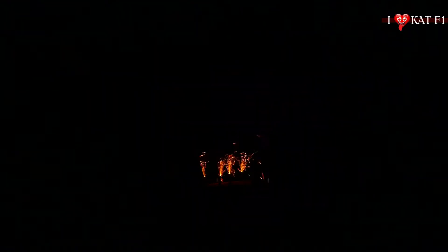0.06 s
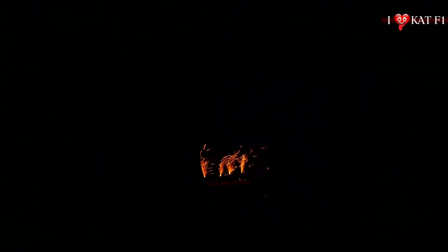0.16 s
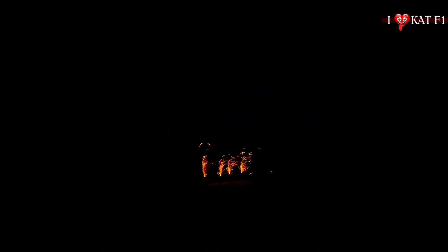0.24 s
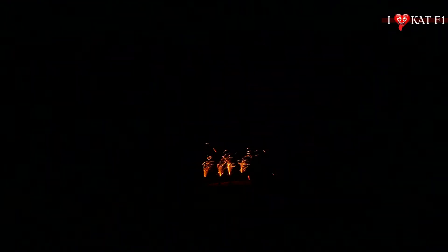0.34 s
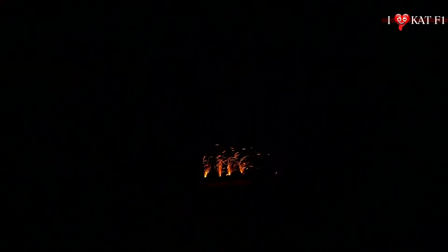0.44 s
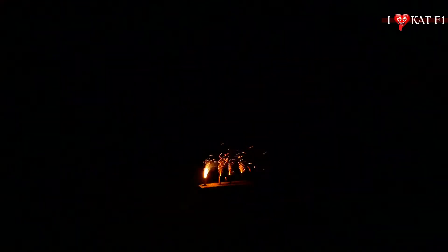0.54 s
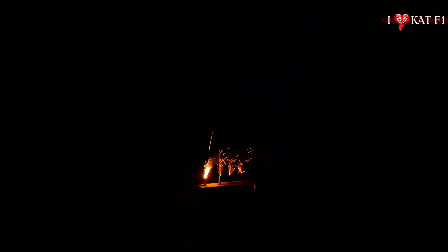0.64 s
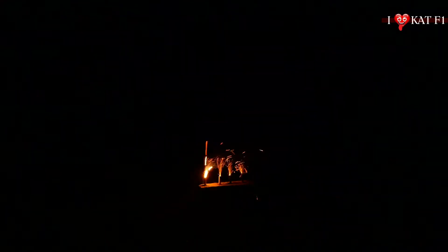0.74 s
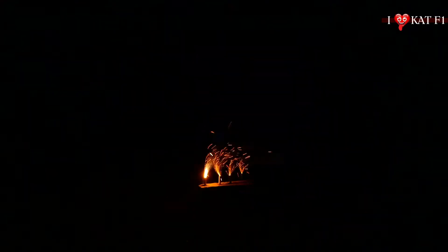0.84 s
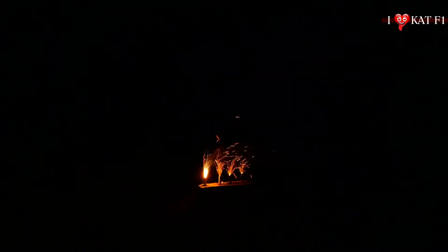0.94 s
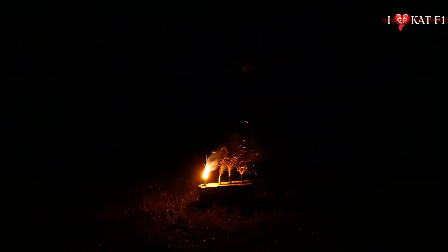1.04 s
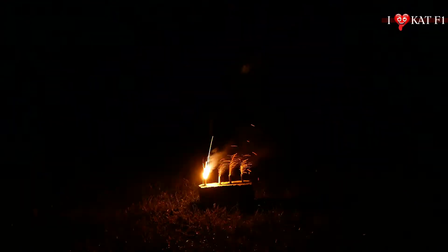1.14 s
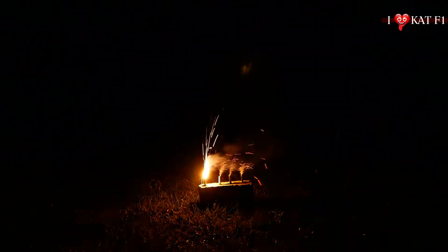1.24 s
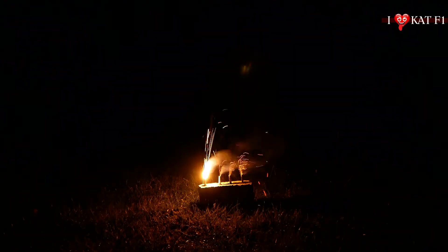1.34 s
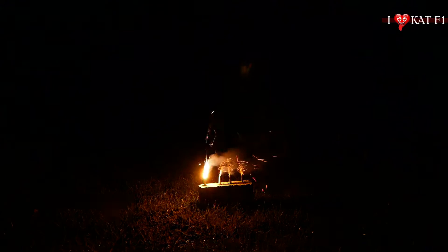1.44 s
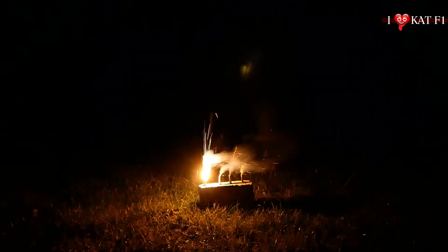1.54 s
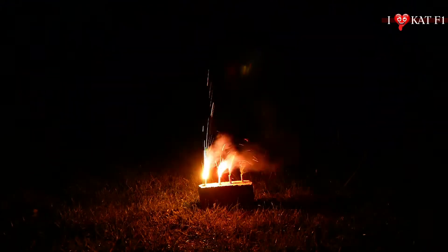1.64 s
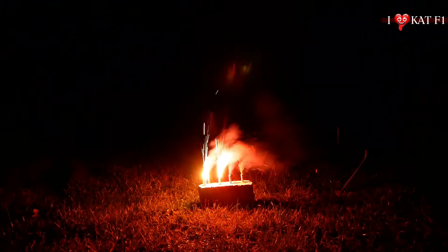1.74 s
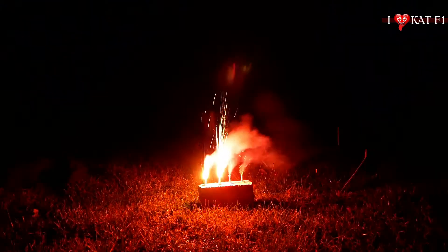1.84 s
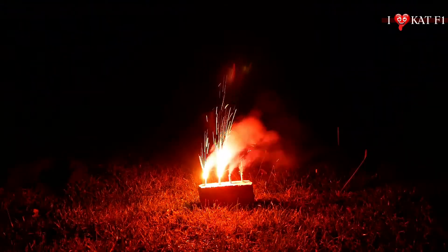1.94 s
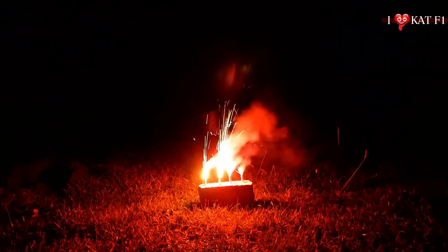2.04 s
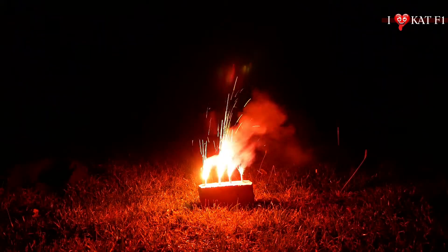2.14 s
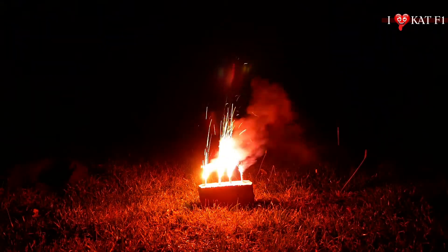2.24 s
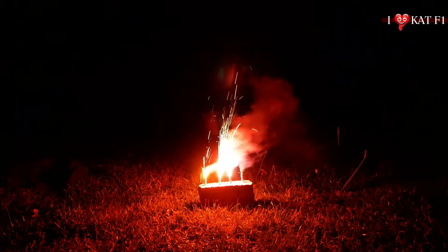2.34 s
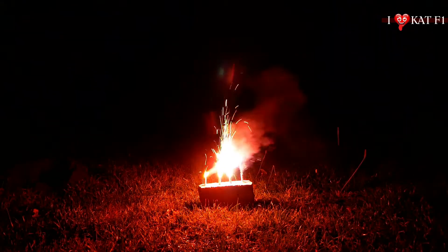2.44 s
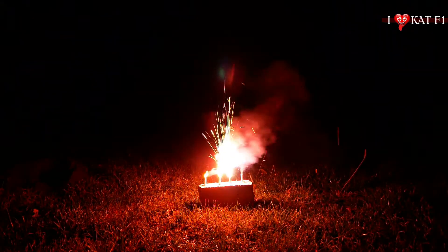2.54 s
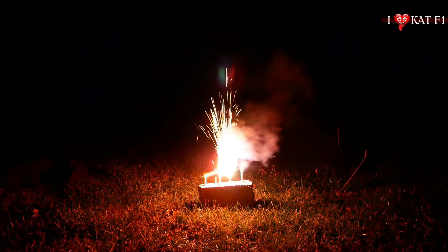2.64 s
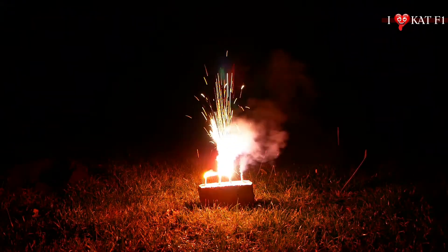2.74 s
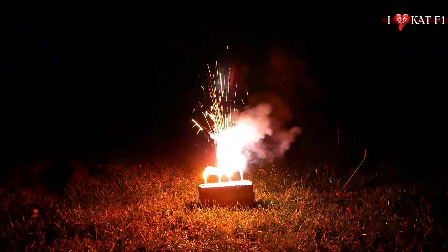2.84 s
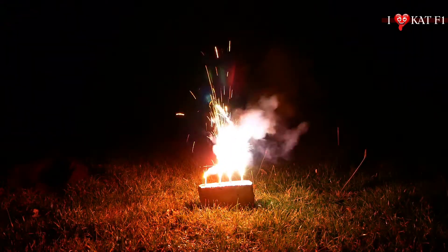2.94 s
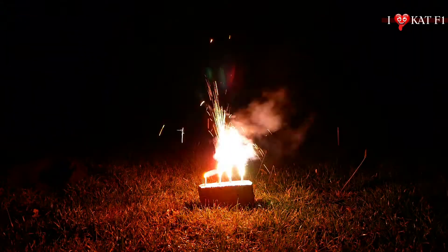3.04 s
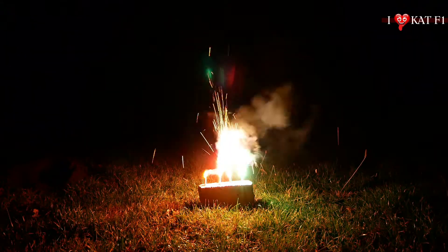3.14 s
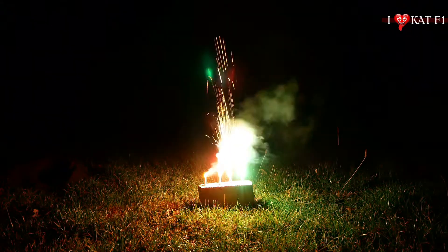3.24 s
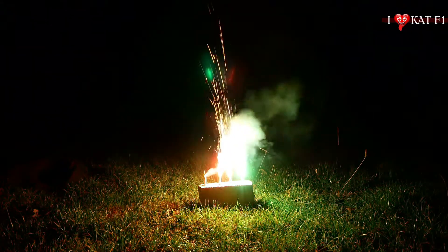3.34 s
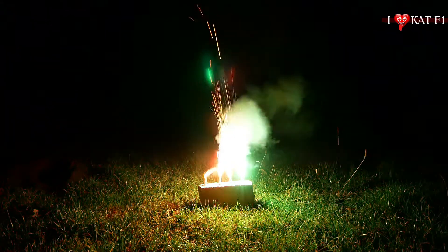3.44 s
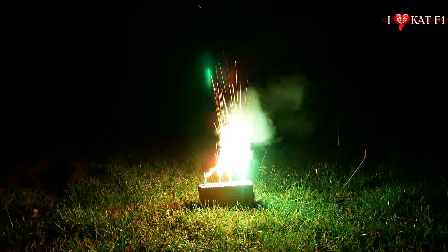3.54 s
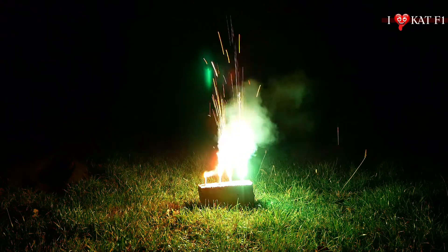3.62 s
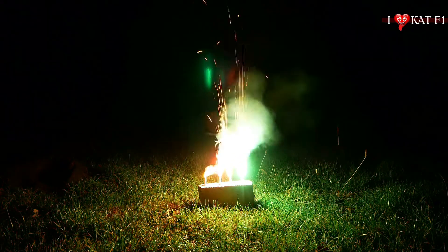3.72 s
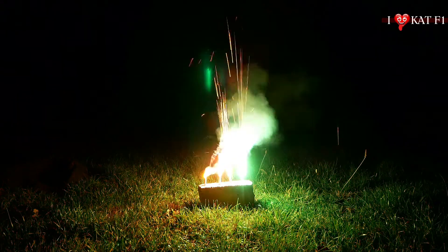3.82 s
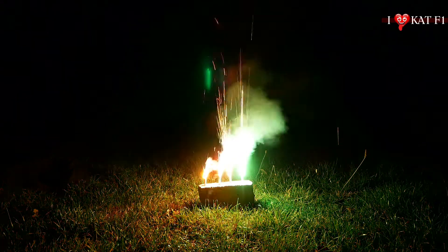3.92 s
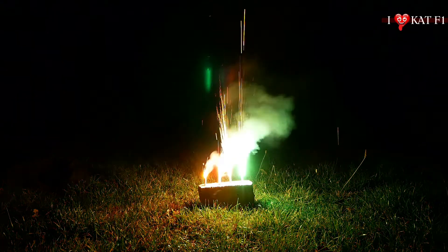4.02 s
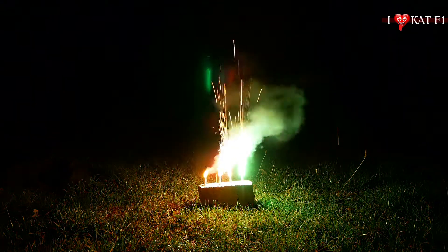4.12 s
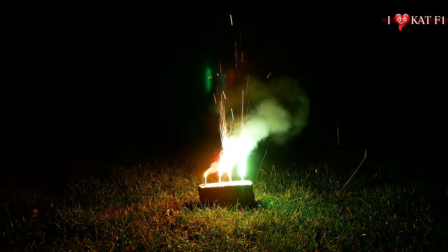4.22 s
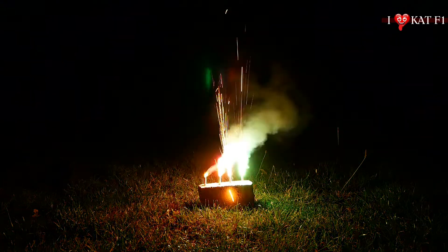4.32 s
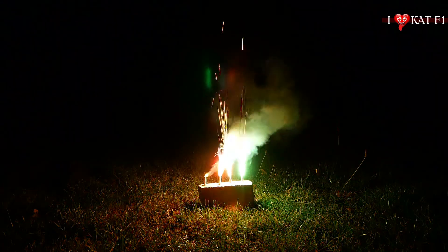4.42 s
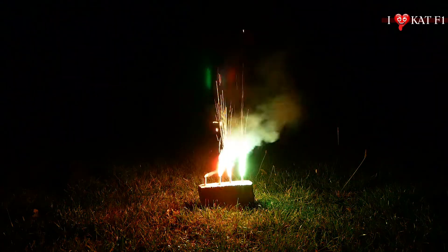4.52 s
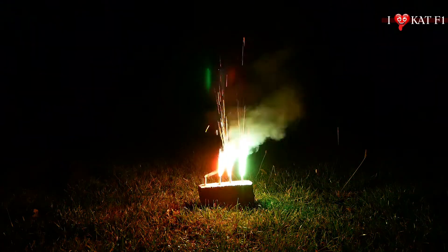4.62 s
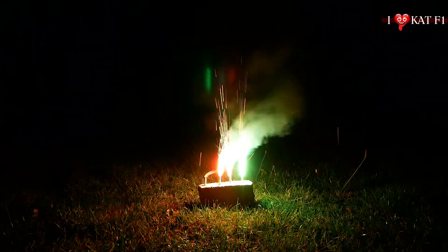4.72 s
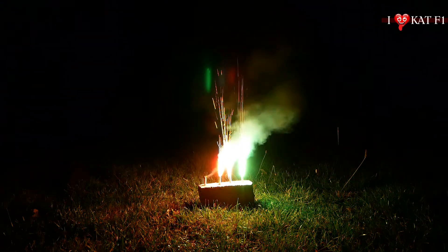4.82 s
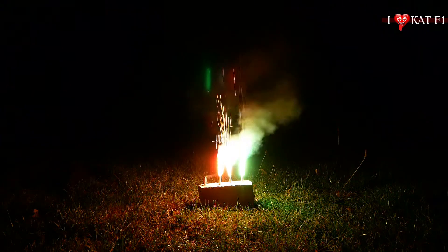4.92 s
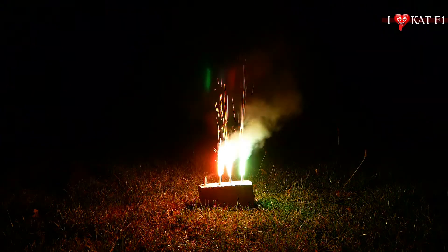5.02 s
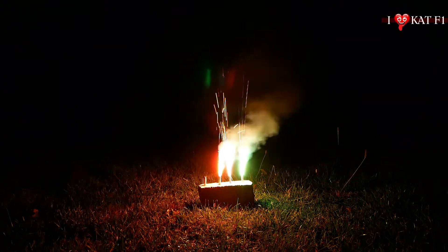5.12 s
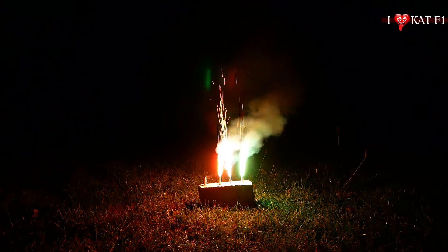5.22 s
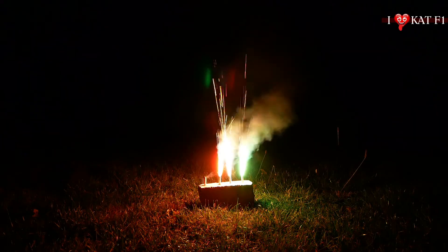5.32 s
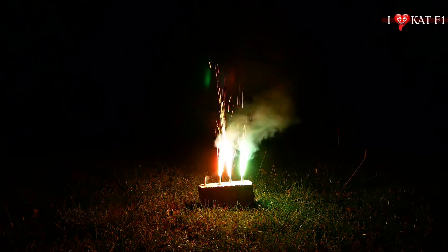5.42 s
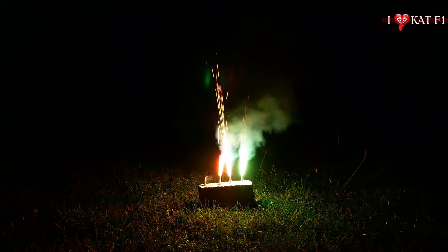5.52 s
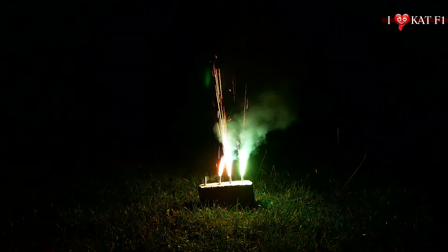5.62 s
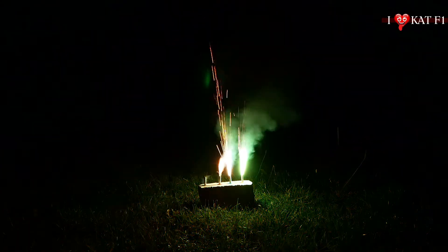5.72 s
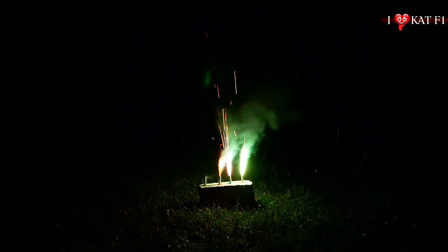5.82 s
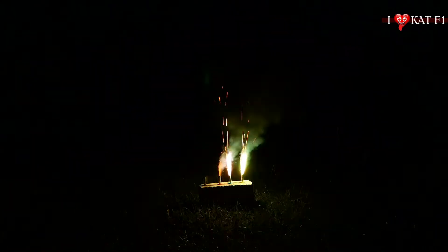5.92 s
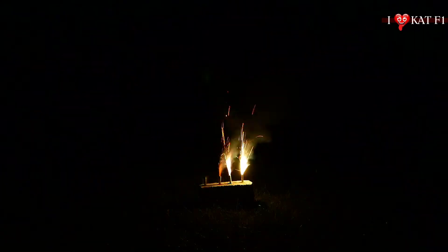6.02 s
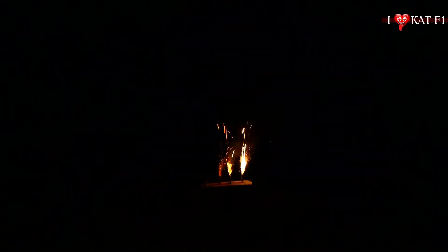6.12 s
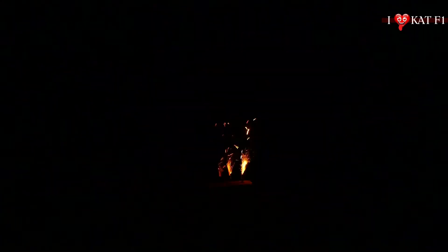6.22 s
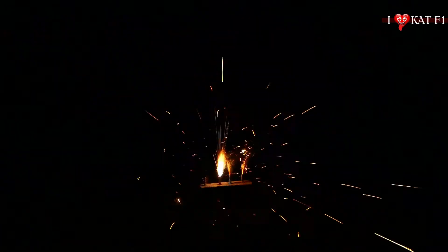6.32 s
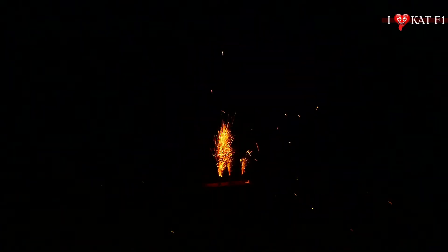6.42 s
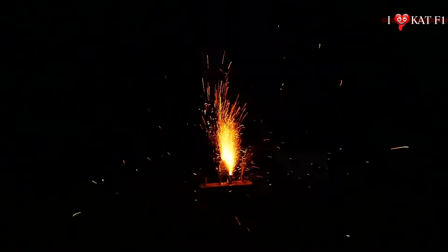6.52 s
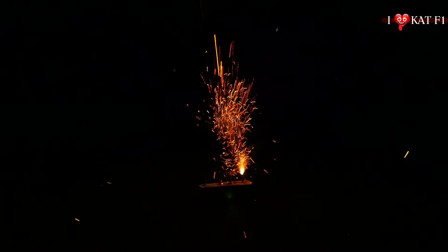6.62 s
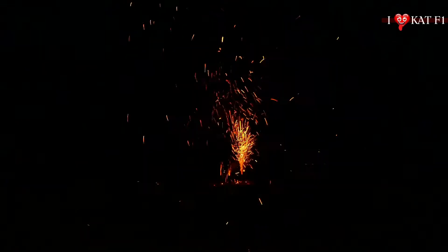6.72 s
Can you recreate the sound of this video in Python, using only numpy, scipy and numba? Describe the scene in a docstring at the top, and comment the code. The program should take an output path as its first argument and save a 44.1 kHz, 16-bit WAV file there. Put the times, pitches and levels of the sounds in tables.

```python
"""Fountain fireworks on a lawn

Small fountains burn at night a few metres from two close microphones. Gas jets hiss as filtered noise,
flames roar, flutter and sputter, and more tubes light. At the end crackle stars burst as pressure pulses
and sprays of cracking grains, overload the recorder and ring off the yard; a faint rumble lies far behind."""
import sys
import numpy as np
from scipy import signal
from scipy.fft import rfft, irfft
from scipy.io import wavfile
from scipy.ndimage import uniform_filter1d
from numba import njit

SR = 44100
rng = np.random.default_rng(int(sys.argv[2]) if len(sys.argv) > 2 else 0)


def log_audio(samples):
    """Write samples as a 16-bit WAV file to the path given in sys.argv[1]."""
    # one column per channel
    frames = np.atleast_2d(samples).T
    # limit to full scale, then quantise
    limited = np.clip(frames, -1, 1)
    pcm = np.round(limited * 32767).astype(np.int16)
    wavfile.write(sys.argv[1], SR, pcm)


N = 298115  # samples

# Nozzle jets, levels before flutter and microphone colour: (time [s], wide-nozzle level [dB],
# mean centre [Hz], narrow-nozzle level [dB], mean centre [Hz], finest spark hiss level [dB])
NOZZLE_JETS = [(0.0, -51.5, 6760, -49, 9420, -51), (0.64, -49, 6710, -43, 10300, -44),
               (0.77, -48.5, 6930, -46.5, 10300, -42.5), (0.86, -41, 7300, -44.5, 10200, -40),
               (1.15, -45, 7160, -47, 9650, -41), (1.52, -45.5, 7300, -44.5, 9260, -39),
               (1.57, -43, 7200, -39.5, 9400, -37), (2.09, -43.5, 6800, -39.5, 10200, -35.5),
               (2.72, -39, 6800, -36, 9400, -35), (3.04, -37.5, 7000, -36.5, 9000, -36.5),
               (3.32, -36, 6800, -38.5, 9100, -32.5), (3.95, -36.5, 6900, -35.5, 9180, -34.5),
               (4.2, -36.5, 6770, -38.5, 9200, -38.5), (4.92, -36, 6200, -42.5, 9000, -39),
               (5.5, -38.5, 5800, -45, 9100, -39.5), (5.95, -42, 5200, -49, 9300, -43),
               (6.27, -52, 4950, -58, 9700, -51.5)]
# Dips and lifts in the steady fountain sound, as the microphones colour it:
# (centre [Hz], half width [Hz], gain [dB])
FOUNTAIN_COLOUR = [(3370, 246, -4), (6070, 580, -3), (7670, 1200, 2), (4850, 370, 1.5)]
# Steady burn, before flares, flutter and microphone colour: (time [s], roar level [dB], rush level [dB],
# sizzle level [dB])
STEADY_BURN = [(0.0, -56, -50, -51), (0.44, -55.5, -51, -50.5), (0.75, -50.5, -49.5, -50),
               (1.1, -54, -50, -49), (1.53, -55, -51.5, -49), (1.83, -45.5, -45.5, -46),
               (2.02, -46.5, -48.5, -46.5), (2.38, -49.5, -48, -46), (2.9, -43.5, -45, -45.5),
               (3.12, -44.5, -45, -45), (3.6, -38.5, -39, -41.5), (3.95, -41, -43.5, -44.5),
               (4.3, -45.5, -48, -47), (5.0, -43.5, -48, -46), (5.3, -46.5, -48, -48),
               (5.6, -44, -45, -47.5), (5.98, -49.5, -52.5, -48.5), (6.14, -47.5, -59, -53),
               (6.27, -58.5, -61.5, -55)]
# Flare-ups over the steady burn: (start [s], rise [s], hold [s], roar gain [dB], rush gain [dB],
# sizzle gain [dB])
FLARE_UPS = [(0.06, 0.11, .01, 5, 3.5, 0.5), (0.805, 0.076, .04, 2.5, 2, 3.5), (1.868, .03, 0.062, 3, 6, 3),
             (2.08, 0.025, 0.077, 3, 2.5, 0.6), (2.275, 0.033, .01, 1, 4.5, 2),
             (2.393, 0.028, 0.4, 8, 7.5, 2.5), (2.5, .11, 0.068, 0, 7, 8), (2.78, 0.013, .01, 2, 1, 2),
             (2.827, 0.026, .004, 5, 2, 2), (2.946, 0.055, .01, 4.5, -3, 2.5),
             (3.111, .11, 0.019, 5.5, 8.5, 8), (3.243, 0.042, 0.14, 2, 8.5, 8.5),
             (3.456, .03, 0.047, 7, 8, 6), (3.68, 0.1, .03, -0.5, 3, 2.5), (3.855, 0.026, .01, 0, 0.5, 0),
             (4.79, 0.028, .01, 3, 2, -1), (5.31, .03, 0.054, 0, 2.5, 3), (5.707, 0.04, .02, 3, -0.5, 0.6),
             (6.0, 0.043, .01, 10, 10, 5.5), (6.08, .015, 0.015, 8, 8.5, 0.6)]
# Single sputters of the flame, before their fade: (time [s], level [dB], pitch [Hz])
SPUTTERS = [(0.55, -38, 166), (1.249, -38, 121), (1.681, -36, 328), (1.959, -43, 159), (2.402, -33, 431),
            (2.552, -22.5, 413), (2.627, -20.5, 285), (2.667, -17, 392), (2.689, -21.5, 398),
            (2.799, -21, 330), (2.844, -22, 165), (3.379, -38, 470), (3.478, -24, 337), (3.93, -29.5, 424),
            (6.018, -40, 256), (6.085, -37, 161)]
# Spectrum shapes of the flame's three layers: (frequency [Hz], relative level per Hz [dB])
ROAR_SPECTRUM = [(13, -53), (22, -11), (52, -9), (163, 0.5), (237, -0.5), (401, 1), (583, -11), (735, -11),
                 (900, -11.5), (1170, -11), (1980, -120)]
RUSH_SPECTRUM = [(290, -30), (500, 1), (562, -4.5), (726, -0.5), (868, -3.5), (1430, -1), (1800, -0.5),
                 (2600, -16.5), (3380, -28), (5720, -120)]
SIZZLE_SPECTRUM = [(1200, -46), (2000, 1), (2700, 1), (4500, -2.5), (6000, -8.5), (9000, -38)]
# Crackle stars and a few of their faint wall echoes:
# (time [s], blast gain [dB], suction length [s], spray gain [dB], spray 60 dB decay [s])
BURSTS = [(6.3299, -2.5, 0.00068, -8, 0.022), (6.3824, -5.5, 0.0012, -4.5, 0.028),
          (6.4826, -5, .0005, -9.5, .02), (6.4961, -5.5, 0.0011, 1.5, .03),
          (6.4998, 7.5, 0.00097, -1, 0.09), (6.5220, -1, 0.001, -5, 0.1), (6.5480, -16, 0.00051, -16, .05),
          (6.5660, -2, 0.001, -12, .04), (6.5731, -10.5, 0.00075, -15, 0.024),
          (6.5757, -19, .0005, -15, 0.027), (6.6708, -5.5, 0.00073, -2.5, 0.016),
          (6.6832, -3, 0.001, -15, 0.028), (6.6848, -14, 0.00053, -4, 0.022),
          (6.7010, -23, 0.00037, -26, .02), (6.7140, 3.5, 0.00087, 3, 0.032),
          (6.7290, -28, 0.0005, -16, 0.2), (6.7385, -26, 0.00084, -13, 0.035)]
# Spectrum shapes of grain spray, yard tail and distant rumble: (frequency [Hz], relative level per Hz [dB])
SPRAY_SPECTRUM = [(35, -30), (60, 0), (335, -12), (909, 1.5), (1070, -7), (1320, -19), (1820, 1),
                  (2250, -0.5), (2900, -8), (8850, 1), (15500, -11.5)]
YARD_SPECTRUM = [(24, -41), (40, -11), (103, -6), (280, 3), (508, -1.5), (1220, 2.5), (1340, 2), (2770, 4),
                 (7890, 1), (15500, -4)]
NIGHT_SPECTRUM = [(15, -10), (30, 9), (70, 9), (150, -3), (400, -17)]
# Likeness of the two microphones for near sources: (frequency [Hz], correlation [0-1])
NEAR_LIKENESS = [(40, 0.89), (300, 0.94), (1400, 0.95), (3100, 0.89), (7000, 0.94), (15000, 0.89)]
# Bursts fill a wide arc of sky, so the sides agree less: (frequency [Hz], correlation [0-1])
SKY_LIKENESS = [(40, 0.7), (300, 0.43), (700, 0.53), (2400, 0.36), (7000, 0.73), (15000, 0.46)]

HUMP_SHARE, NARROW_SHARE = 0.57, 0.71  # wide hump's width over its centre; narrow hump's share of that
SPURT_S, SPURT_DB, SPURT_WIDTH_S = 2.6, 3.5, .035  # one brief spurt from all nozzles
CALM_DB, UNREST = -52, 0.046  # flutter scale grows by UNREST dB for each dB of roar above CALM_DB
THROAT_HZ, THROAT_WANDER = 1490, 0.054  # resonance in the rush, and the share by which it wanders
THROAT_GAIN, THROAT_SHARE = 0.43, 0.97  # amplitude; width over centre
FLARE_FALL_S, PUFF_T60_S = 0.024, .033
STARS_LEFT_DB = .4  # the stars burst a little left of centre
SPRAY_ONSET_S = 0.00054  # the grains catch just after the blast
CRACKS_PER_S, CRACK_DB, CRACK_SPREAD_DB = 440, -9.5, 1
GROUND_S, GROUND_GAIN, GROUND_HZ = .00062, .95, 9000  # lawn echo: delay, amplitude, treble corner
YARD_DB, YARD_T60_S, YARD_TREBLE_T60_S, YARD_ONSET_S = -9.5, 0.41, 0.33, 0.016
WALL_S, WALL_SPREAD_S, WALL_DB = 0.028, 0.0049, 4.5  # the nearest wall answers in a clump
NIGHT_DB = -60  # mean level of the rumble
BASS_LEFT_DB, BASS_LEFT_HZ = 2, 200  # left over right at the lowest bass; halved in dB at this frequency
PORT_LAG_S, MIC_HZ, TOP_HZ = .000025, 58.6, 15617  # left lead; bass corner; treble edge


def jets():
    """Turbulent gas from two sizes of nozzle: two hiss humps, the lower sinking as the holes burn wider."""
    wide_db, wide_hz, narrow_db, narrow_hz, fine_db = curves(NOZZLE_JETS)
    fine_spectrum = [(6000, -29), (10000, -8.5), (12000, -6), (15500, -4.5)]  # (frequency [Hz], level [dB])
    out = colour(pair(), fine_spectrum) * undb(fine_db + 0.64 * walk(20))
    nozzles = (
        (wide_db, wide_hz, HUMP_SHARE),
        (narrow_db, narrow_hz, NARROW_SHARE * HUMP_SHARE),
    )
    for db, mean_hz, share in nozzles:
        hz = mean_hz * (1 + 0.014 * walk(9))
        share = np.full(N, share)
        # two passes: the second is broader
        hump = np.array([svf(svf(side, hz, share), hz, 3.2 * share) for side in pair()])
        hump /= np.sqrt(uniform_filter1d(np.mean(hump ** 2, 0), SR // 4))  # even out slow level drift
        out += hump * undb(db + .7 * walk(14) + .9 * walk(50))
    spurt_db = SPURT_DB * np.exp(-((np.arange(N) / SR - SPURT_S) / SPURT_WIDTH_S) ** 2)
    return out * undb(spurt_db)


def flames():
    """Burning gas: roar, rush and sizzle flutter together, more so in a flare, under single sputters."""
    roar_db, rush_db, sizzle_db = curves(STEADY_BURN) + flares()
    flutter_db = UNREST * np.maximum(roar_db - CALM_DB, 0) * (walk(55) + 1.1 * walk(150))
    out = colour(pair(), ROAR_SPECTRUM) * undb(roar_db + flutter_db + 1.2 * walk(25.03))
    rush = colour(pair(), RUSH_SPECTRUM)
    throat_hz = THROAT_HZ * (1 + THROAT_WANDER * walk(5.1))
    throat_share = np.full(N, THROAT_SHARE)
    rush += THROAT_GAIN * np.array([svf(side, throat_hz, throat_share) for side in rush])
    out += unit(rush) * undb(rush_db + 1.1 * flutter_db + 0.19 * walk(30))
    out += colour(pair(), SIZZLE_SPECTRUM) * undb(sizzle_db + 1.45 * flutter_db)
    add_sputters(out)
    return out


def flares():
    """Every flare-up rises, holds and drops back; overlapping gains add in dB."""
    t = np.arange(N) / SR
    gains_db = 0
    for start, rise, hold, *gain_db in FLARE_UPS:
        corners = np.cumsum([0, rise, hold, FLARE_FALL_S])
        shape = np.interp(t - start, corners, [0, 1, 1, 0])
        gains_db = gains_db + np.outer(gain_db, shape)
    return gains_db


def add_sputters(out):
    """A puff of flame is a short pitched thump with rush-coloured grit, the same on both sides."""
    t = np.arange(SR // 10) / SR
    fade = (1 - np.exp(-t / 0.0021)) * 1000 ** (-t / PUFF_T60_S)
    grits = colour(rng.standard_normal((len(SPUTTERS), len(t))), RUSH_SPECTRUM)
    for (s, db, hz), grit in zip(SPUTTERS, grits):
        i = int(s * SR)
        out[:, i:i + len(t)] += undb(db) * fade * (np.sin(2 * np.pi * hz * t) + 0.58 * grit)


def stars():
    """Each burst, or its faint echo, is a blast and a dying spray of grains with small cracks inside it."""
    blasts, spray_power = np.zeros((2, N + SR)), np.zeros((2, N + SR))
    t = np.arange(SR // 2) / SR
    pan = undb(np.array([[STARS_LEFT_DB], [-STARS_LEFT_DB]]) / 2)
    onset = 1 - np.exp(-(t / SPRAY_ONSET_S) ** 2)
    for s, blast_db, suck, spray_db, t60 in BURSTS:
        i = int(s * SR)
        blasts[:, i:i + len(t)] += undb(blast_db) * pan * blast(t, suck)
        envelope = undb(spray_db) * pan * onset * 1000 ** (-t / t60)
        spray_power[:, i:i + len(t)] += envelope ** 2  # overlapping sprays add in power
    spray = np.sqrt(spray_power[:, :N])
    struck = rng.random(N) < CRACKS_PER_S / SR
    size = struck * undb(CRACK_DB + CRACK_SPREAD_DB * np.minimum(rng.exponential(size=N), 4))
    crack_pan = undb(2.6 * rng.standard_normal(N) * np.array([[1], [-1]]))
    crack = blast(t[None, :64], 0.00042)
    cracks = signal.fftconvolve(spray * size * crack_pan, crack, axes=1)[:, :N]
    grains = colour(pair(SKY_LIKENESS), SPRAY_SPECTRUM) * undb(4.8 * walk(400) + 1.4 * walk(90))
    return blasts[:, :N] + cracks, spray * grains


def blast(t, suck):
    """A steep pressure peak, then a longer suction."""
    peak = 3.2 * np.exp(-t / .00009)
    suction = 1.5 * np.sin(np.pi * np.minimum(t / suck, 1)) ** .6
    return peak - suction


def ground(x):
    """The lawn returns a duller copy a moment later."""
    hz = np.fft.rfftfreq(N, 1 / SR)
    delay = np.exp(-2j * np.pi * hz * GROUND_S)
    echo = GROUND_GAIN * delay / (1 + 1j * hz / GROUND_HZ)
    return irfft(rfft(x) * (1 + echo), N)


def yard(x):
    """Fences and walls return the energy of each burst as a diffuse tail; the treble dies first."""
    t = np.arange(SR // 2) / SR
    tail = colour(pair(SKY_LIKENESS), YARD_SPECTRUM)
    low = signal.sosfilt(signal.butter(1, 4000, fs=SR, output="sos"), tail)
    wall_db = WALL_DB * np.exp(-((t - WALL_S) / WALL_SPREAD_S) ** 2)
    onset = 1 - np.exp(-(t / YARD_ONSET_S) ** 2)
    power = np.mean(x ** 2, 0)
    out = 0
    for band, t60 in ((low, YARD_T60_S), (tail - low, YARD_TREBLE_T60_S)):
        fade = onset * undb(wall_db - 60 * t / t60) ** 2
        energy = signal.fftconvolve(power, fade / fade.sum())[:N]
        out = out + band * np.sqrt(np.maximum(energy, 0))
    return undb(YARD_DB + 1.1 * walk(56)) * out


def night():
    """Distant rumble: bass-heavy noise whose level drifts slowly."""
    return colour(pair(), NIGHT_SPECTRUM) * undb(NIGHT_DB + 2.0 * walk(3))


def microphone_colour(x):
    """The microphones' dips and lifts in the steady fountain sound, as resonance-shaped gains."""
    hz = np.fft.rfftfreq(N, 1 / SR)
    gain_db = sum(db / (1 + ((hz - f) / width) ** 2) for f, width, db in FOUNTAIN_COLOUR)
    return irfft(rfft(x) * undb(gain_db), N)


def pair(likeness=NEAR_LIKENESS):
    """White noise on two microphones, correlated by frequency through its mid and side parts."""
    alike = table(likeness, np.fft.rfftfreq(N, 1 / SR))
    mid, side = rfft(rng.standard_normal((2, N)))
    mid = mid * np.sqrt(1 + alike)
    side = side * np.sqrt(1 - alike)
    return irfft(np.array([mid + side, mid - side]), N) / np.sqrt(2)


def colour(x, points):
    """Shape by a spectrum; rms 1."""
    n = x.shape[-1]
    gain = undb(table(points, np.fft.rfftfreq(n, 1 / SR)))
    return unit(irfft(rfft(x) * gain, n))


def walk(rate):
    """Random levels, rate per second, slewed twice; spread near 1."""
    k = int(SR / rate)
    held = np.repeat(rng.standard_normal(N // k + 1), k)
    return 1.19 * uniform_filter1d(uniform_filter1d(held, k), k)[:N]


@njit
def svf(x, hz, share):
    """Band-pass whose centre and relative width can move every sample."""
    y, band, low = np.empty(len(x)), 0., 0.
    for i in range(len(x)):
        g = np.tan(np.pi * hz[i] / SR)
        v = (band + g * (x[i] - low)) / (1 + g * (g + share[i]))
        band = 2 * v - band
        low = low + 2 * g * v
        y[i] = share[i] * v
    return y


def curves(rows):
    """Draw straight lines through each column against the times in the first."""
    s, *columns = np.transpose(rows)
    return [np.interp(np.arange(N) / SR, s, column) for column in columns]


def table(points, hz):
    """Read (frequency [Hz], value) points on a log-frequency axis."""
    f, v = np.transpose(points)
    return np.interp(np.log(np.maximum(hz, 1)), np.log(f), v)


def undb(db):
    """Decibels to amplitude."""
    return 10 ** (np.asarray(db) / 20)


def unit(x):
    """Scale to rms 1."""
    return x / np.sqrt(np.mean(x ** 2))


def scene():
    """Fountains and bursts up close, their returns from lawn and yard, and the night far off."""
    blasts, spray = stars()
    fountains = microphone_colour(jets() + flames())
    bursts = ground(blasts) + spray
    return fountains + bursts + yard(blasts + spray) + night()


def record(dry):
    """The left port hears sooner and more bass; the bass rolls off, peaks clip, the top is cut."""
    hz = np.fft.rfftfreq(N, 1 / SR)
    # each side takes half of the level and time difference
    bass = undb(BASS_LEFT_DB / (1 + hz / BASS_LEFT_HZ) / 2)
    left = bass * np.exp(1j * np.pi * hz * PORT_LAG_S)
    ports = irfft(rfft(dry) * np.array([left, 1 / left]), N)
    ports = signal.sosfilt(signal.butter(2, MIC_HZ, "high", fs=SR, output="sos"), ports)
    top = signal.ellip(10, .2, 70, TOP_HZ, fs=SR, output="sos")
    return signal.sosfilt(top, np.clip(ports, -.9, .9))


dry = scene()
out = record(dry)
log_audio(out)
```